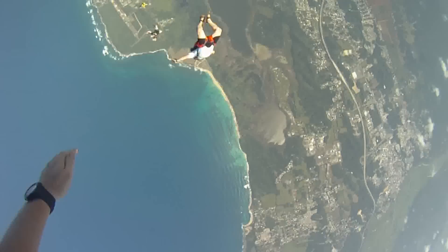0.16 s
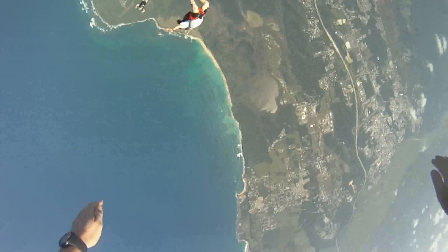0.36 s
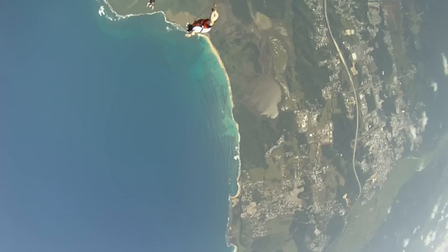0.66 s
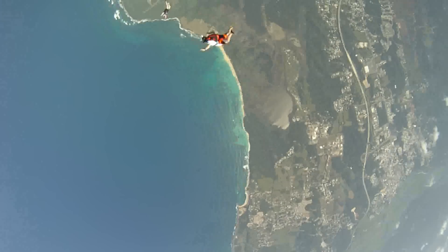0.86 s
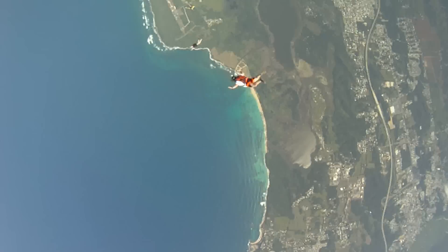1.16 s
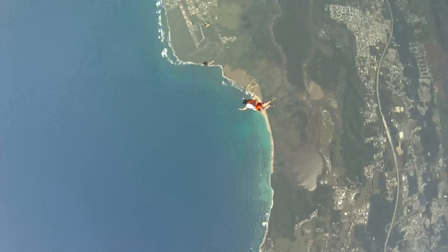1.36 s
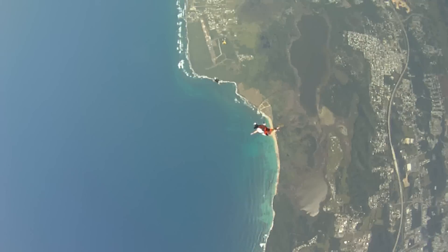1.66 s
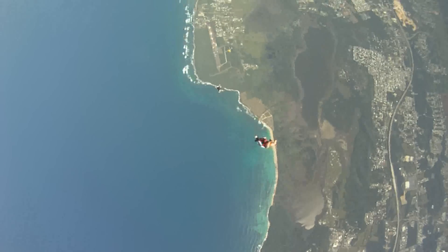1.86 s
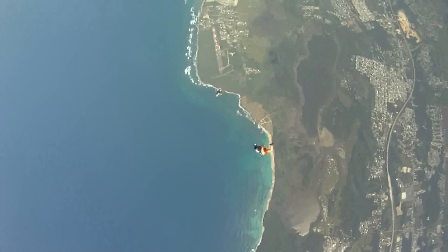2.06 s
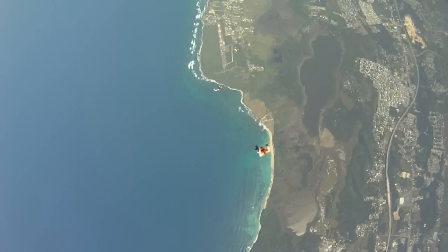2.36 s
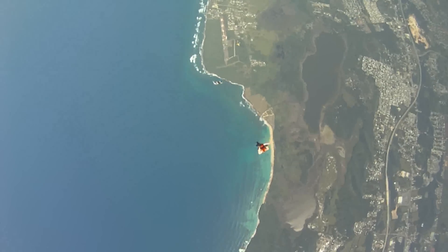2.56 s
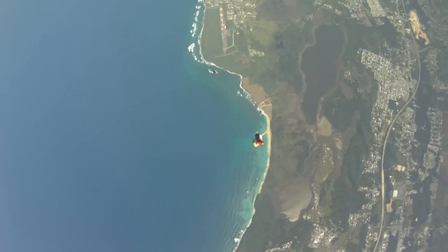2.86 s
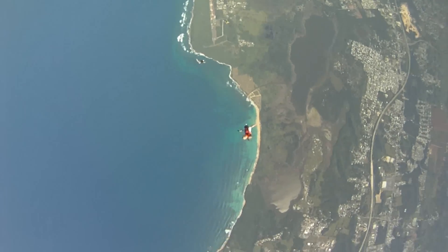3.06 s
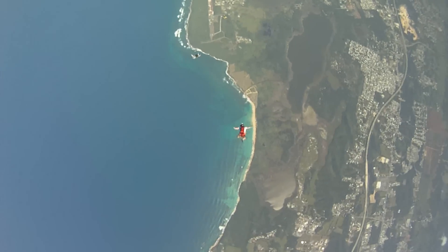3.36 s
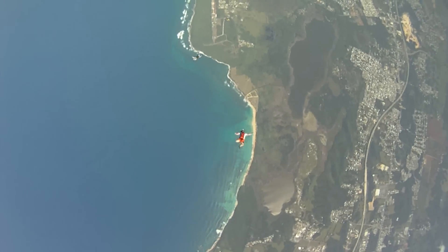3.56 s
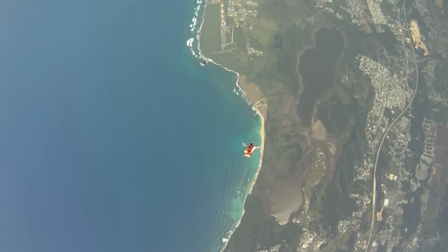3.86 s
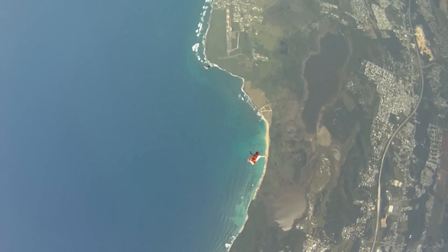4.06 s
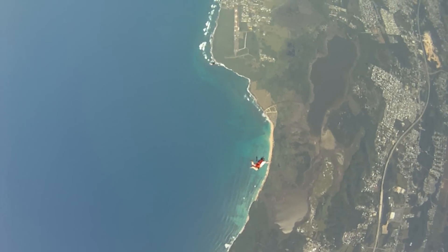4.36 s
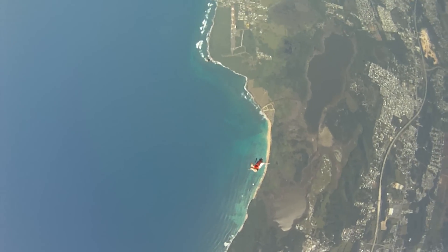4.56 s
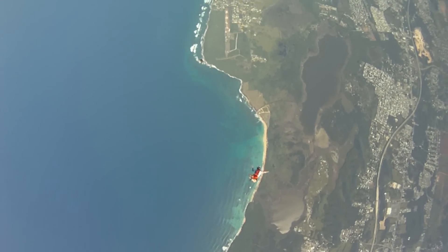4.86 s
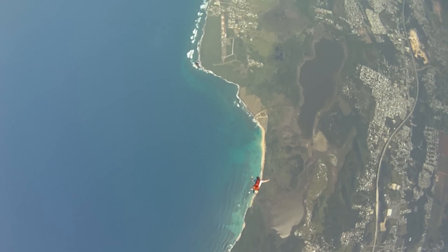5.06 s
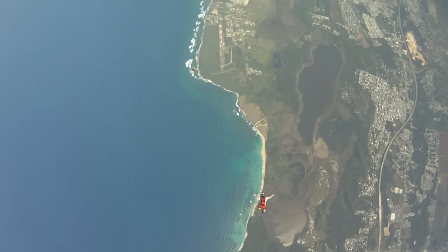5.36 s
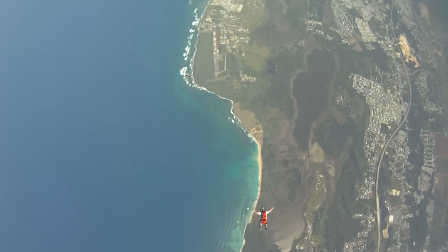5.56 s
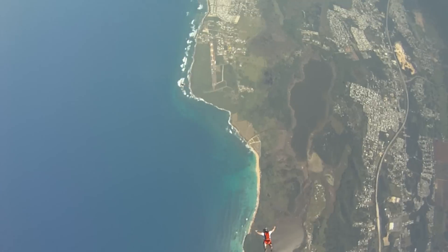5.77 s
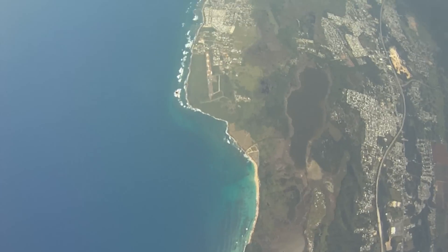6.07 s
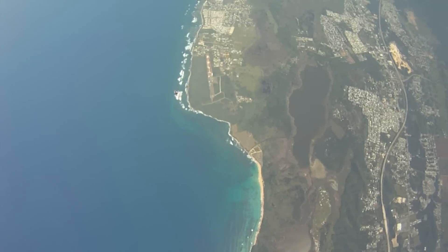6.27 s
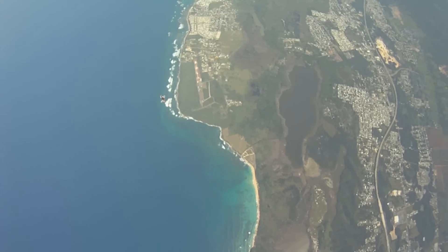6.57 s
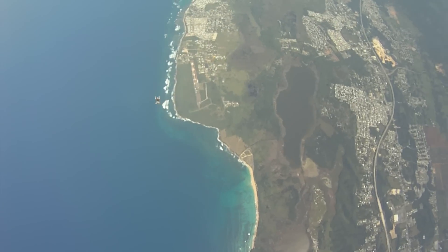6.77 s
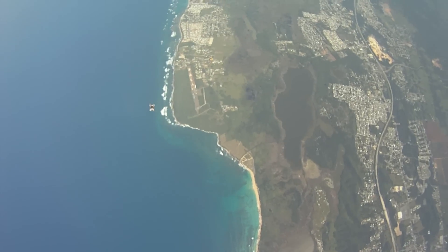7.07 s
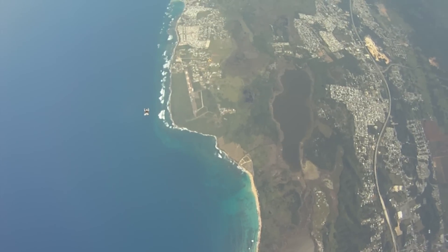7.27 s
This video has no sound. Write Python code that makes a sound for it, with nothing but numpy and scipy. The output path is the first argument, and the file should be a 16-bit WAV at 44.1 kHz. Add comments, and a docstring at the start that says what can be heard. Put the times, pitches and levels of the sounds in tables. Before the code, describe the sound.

Loud skydiving wind blasts a small cased camera: an opening thump, brief breathy whistles and a hollow hoot, then constant hissing, fluttering rush.

```python
"""A low thump comes first, then rushing air builds up fast: freefall past a skydiver's small cased camera.
Eddies, which are swirls of air, thump, rumble and roar on the case: shaped noise plus its resonances.
An edge whistles short notes as the head turns, over a hollow hoot of the case.
Loudest is the jet across the microphone port: it rushes and rings the port's cavity, with short surges.
The camera mirrors the sound into a gritty treble hiss, and its limiter ducks loud moments and recovers."""
import sys
import numpy as np
from scipy import signal
from scipy.fft import rfft, irfft, next_fast_len
from scipy.io import wavfile
from scipy.ndimage import uniform_filter1d, map_coordinates

SR = 44100
rng = np.random.default_rng(int(sys.argv[2]) if len(sys.argv) > 2 else 0)


def int16_out(signal):
    """Quantize to a 16-bit WAV file."""
    q = np.round(np.clip(np.atleast_2d(signal).T, -1, 1) * 32767)
    wavfile.write(sys.argv[1], SR, q.astype(np.int16))


N = 327222

# Strength of the smaller eddies on the case over time.
# Columns: time_s, rumble_db, roar_db (before small trims and wavering)
EDDY_LEVELS = [(0.0, -28, -35.5), (0.12, -20, -23), (0.27, -22, -17), (0.31, -23, -23), (0.78, -21, -24),
               (0.91, -25, -24.5), (1.01, -21, -24.5), (1.61, -23, -18.5), (3.35, -22, -16),
               (3.43, -23.5, -20.5), (4.07, -26, -20), (4.3, -21.5, -18.5), (4.32, -25.5, -20.5),
               (5.25, -29, -22), (5.46, -32, -22.5), (5.56, -27.5, -21.5), (7.11, -30.5, -22.5),
               (7.42, -30, -22)]
# Big eddies that strike the case.
# Columns: centre_s, length_s, buffet_rise_db
THUMPS = [(0.02, 0.15, 12), (0.17, 0.17, 6), (1.057, 0.2, 8.5), (1.654, .3, 6), (1.825, .16, 8),
          (2.38, .18, 8), (2.85, 0.56, 4.5), (4.13, 0.11, 11), (6.025, .24, 6)]
# How strongly the case and cavity ring compared with the plain rush; each resonance adds its own offset.
# Columns: time_s, ring_over_rush_db
RING_BALANCE = [(0, 2.5), (.8, -6), (1.5, -2.5), (3.2, -1.5), (3.6, 1), (4.5, 3.5), (5.5, 3), (7.42, 3)]
# Colour of the noise in each layer; only the shape counts, because each noise is scaled to rms 1.
# Columns: frequency_hz, relative_level_db (per Hz)
BUFFET_COLOUR = [(10, -26), (22, -15), (50, -2), (66, -4), (83, 1.5), (100, -7), (125, -24), (190, -26)]
RUMBLE_COLOUR = [(70, -36), (120, -0.5), (170, 3), (220, 1.5), (305, 3), (370, -4), (460, -8), (600, -5.5)]
ROAR_COLOUR = [(380, -24), (480, -17.5), (550, -3.5), (640, -4.5), (700, 2.5), (810, -2), (895, 3.5),
               (970, -4), (1180, -4.5), (1270, -4.5), (1450, -7), (1800, -9), (2500, -16)]
RUSH_COLOUR = [(1200, -10.5), (1700, -13), (2080, 3.5), (2580, -2), (2760, -6), (2990, -1), (3230, -10),
               (3500, -3.5), (3900, -9), (4430, -15), (5080, -7.5), (5400, -15.5), (5750, -28.5),
               (6000, -45)]
# Hollow hoots of the case in the slanting flow.
# Columns: start_s, length_s, level_db
HOOTS = [(0.286, .5, -21.5), (0.997, .3, -29)]
# Notes of the whistling edge; a positive scoop starts below the pitch.
# Columns: start_s, length_s, pitch_hz, scoop_hz, level_db
WHISTLE_NOTES = [(0.254, 0.15, 3110, 600, -23), (0.357, 0.31, 3534, 380.5, -19),
                 (0.64, 0.21, 4160, 198, -24.5), (1.046, 0.14, 4170, 1, -27.5),
                 (1.167, 0.1, 3550, 97, -21.5), (1.318, 0.034, 3450, -2, -18),
                 (1.36, 0.043, 3410, 201, -14.5)]
# Strength of the jet across the port, building up at first and then steady.
# Columns: time_s, level_db (before a small fixed lift)
JET_LEVELS = [(0.0, -42), (0.06, -32.5), (0.29, -14), (0.41, -18.5), (0.78, -18.5), (0.85, -13.5),
              (0.93, -17.5), (1.22, -17), (3.16, -18), (5.0, -16), (7.23, -16), (7.42, -15.5)]
# Sudden surges of the jet; the rushing air follows half of the rise in dB.
# Columns: centre_s, rise_db
SURGES = [(.836, 9), (1.638, 4), (2.123, 4), (2.766, 5.5), (3.495, 5), (3.634, 5.5), (3.842, 6.5),
          (4.307, 7), (4.519, 6), (4.777, 5), (5.091, 5.5), (5.312, 7.5), (5.431, 4), (5.743, 5.5),
          (6.165, 6), (6.407, 4.5), (6.562, 7.5), (7.004, 6), (7.082, 4), (7.284, 4)]
# Moments when the jet stalls.
# Columns: centre_s, drop_db
STALLS = [(3.87, 2.5), (6.425, 4), (6.6, 1), (7.041, 7)]
# Level of the very faint separate noise that slightly widens an almost mono sound.
# Columns: frequency_hz, side_gain_db
SIDE_LEVELS = [(150, -51), (700, -58), (2300, -36.5), (14000, -60)]
# Colour of the mirrored treble, thin around 12 kHz.
# Columns: frequency_hz, gain_db
TREBLE_COLOUR = [(6000, 5.5), (6900, -2.5), (8500, -8), (9650, -12.5), (10500, -17.5), (11100, -35),
                 (11600, -34), (12000, -60), (12400, -34), (12900, -23), (13700, -31), (14350, -14),
                 (15000, -41), (15400, -34)]

BUFFET_DB = -28.5  # buffet level when the rumble is average and no thump strikes
BUFFET_GROWS = 0.87  # dB of buffet gained per dB of rumble
WHISTLE_FADE = 0.17  # share of a note's length spent rising, and again falling
SCOOP_S, HOOT_FADE_S = 0.03, 0.038  # settling time of a note's pitch; rise and fall of a hoot
CAVITY_HZ = 2345  # centre of the port cavity's ring
FLUTTER_DB, FLUTTER_GROWS = 0.72, 0.1  # slow jet flutter at 0 dB ring; dB more per dB of ring
SURGE_S, STALL_S = 0.0099, 0.044  # full lengths
LOCK_DB = 4  # boost of the locked tone
MIRROR_HZ, TOP_HZ = 12000, 15400  # converter's rate; camera's upper band limit


def amp(db):
    """Turn decibels into a gain."""
    return 10 ** (np.asarray(db) / 20)


def unit(x):
    """Scale a signal to an average strength (rms) of 1."""
    return x / np.sqrt(np.mean(x ** 2) + 1e-20)


def along(points, hz):
    """Read a table of (frequency, value) points on a logarithmic frequency axis."""
    frequency, value = np.transpose(points)
    return np.interp(np.log(hz + 1), np.log(frequency + 1), value)


def curves(rows):
    """Join the points of each column after the time into one value per sample."""
    times, *columns = np.transpose(rows)
    return [np.interp(np.arange(N) / SR, times, column) for column in columns]


def wobble(rate):
    """A smooth random curve through rate random points a second."""
    knots = rng.standard_normal(N // 20)
    return map_coordinates(knots, [np.arange(N) * rate / SR], mode="wrap")


def swell(centre, length):
    """A smooth bump from 0 to 1 and back; times in seconds."""
    position = (np.arange(N) / SR - centre) / length
    return np.cos(np.pi * np.clip(position, -0.5, 0.5)) ** 2


def held(start, length, fade):
    """A gain that rises, holds at 1 and falls; times in seconds."""
    t = np.arange(N) / SR - start
    return np.clip(np.minimum(t, length - t) / fade, 0, 1)


def filtered(x, response):
    """Multiply the spectrum of x by a gain that depends on frequency."""
    size = next_fast_len(N + SR // 2)  # spare room keeps the end from wrapping onto the start
    spectrum = rfft(x, size) * response(np.fft.rfftfreq(size, 1 / SR))
    return irfft(spectrum, size)[..., :N]


def noise(colour):
    """Noise of rms 1 with the given colour, silent outside its frequency range."""
    def response(hz):
        inside = (hz >= colour[0][0]) & (hz <= colour[-1][0])
        return amp(along(colour, hz)) * inside
    return unit(filtered(rng.standard_normal(N), response))


def blown(centre_hz, width_hz):
    """Noise of rms 1 ringing in a steep-sided resonance, strongest at its centre."""
    def response(hz):
        damping = (hz * width_hz) ** 2
        return damping / ((centre_hz ** 2 - hz ** 2) ** 2 + damping)
    return unit(filtered(rng.standard_normal(N), response))


def ringing(rush, ring, ring_db):
    """Mix a ring into a rush, then scale so their combined power stays about the same."""
    return (rush + amp(ring_db) * ring) / np.sqrt(1 + amp(ring_db) ** 2)


def eddies():
    """Large eddies thump on the case, smaller ones rumble and roar, all exciting the case's resonances."""
    rumble_db, roar_db = curves(EDDY_LEVELS)
    ring_db, = curves(RING_BALANCE)

    thump_db = sum(rise * swell(centre, length) for centre, length, rise in THUMPS)
    buffet_db = BUFFET_DB + BUFFET_GROWS * (rumble_db - rumble_db.mean()) + thump_db
    thumps = ringing(noise(BUFFET_COLOUR), blown(centre_hz=85, width_hz=41), ring_db - 0.5)
    buffet = amp(buffet_db) * unit(np.tanh(0.5 * thumps))  # flatten the highest peaks

    rumble = ringing(noise(RUMBLE_COLOUR), blown(centre_hz=318, width_hz=120), ring_db - 7.5)
    rumble *= amp(rumble_db + 0.47 * wobble(14))

    roar = ringing(noise(ROAR_COLOUR), blown(centre_hz=864, width_hz=233), ring_db - 5.5)
    roar *= amp(roar_db + 0.11 + 0.78 * wobble(30))
    return buffet + rumble + roar


def hoot():
    """Slanting flow sets the case's hollow resonance sounding, as noise in a narrow band."""
    gain = sum(amp(db) * held(start, length, HOOT_FADE_S) for start, length, db in HOOTS)
    return gain * blown(centre_hz=278, width_hz=39)


def whistle(width_hz, waver_hz):
    """Vortices leave an edge unevenly, smearing each scooping, wavering note into a narrow band."""
    t = np.arange(N) / SR
    waver = waver_hz * wobble(90)
    # two slow random signals carry the note's cosine and sine, which makes it breathy
    breath_a, breath_b = filtered(rng.standard_normal((2, N)), lambda hz: 1 / (1 + (hz / width_hz) ** 2))
    notes = np.zeros(N)
    for start, length, pitch_hz, scoop_hz, db in WHISTLE_NOTES:
        pitch = pitch_hz + waver - scoop_hz * np.exp(-np.abs(t - start) / SCOOP_S)
        phase = 2 * np.pi * np.cumsum(pitch) / SR
        tone = unit(breath_a * np.cos(phase) + breath_b * np.sin(phase))
        notes += amp(db) * held(start, length, WHISTLE_FADE * length) * tone
    return notes


def jet():
    """Air rushing over the port rings its cavity, flutters, and locks it into one tone in each surge."""
    jet_db, = curves(JET_LEVELS)
    ring_db, = curves(RING_BALANCE)
    # the slower flutter deepens as the cavity rings harder
    flutter_db = (FLUTTER_DB + FLUTTER_GROWS * ring_db) * wobble(45) + 0.72 * wobble(260)
    stall_db = sum(drop * swell(centre, STALL_S) for centre, drop in STALLS)
    surge_db = sum(rise * held(centre - SURGE_S / 2, SURGE_S, SURGE_S / 4) for centre, rise in SURGES)

    ring = blown(centre_hz=CAVITY_HZ, width_hz=334) * amp(0.29 * wobble(110))
    air = ringing(noise(RUSH_COLOUR), ring, ring_db) * amp(0.5 * surge_db + flutter_db)

    locked_pitch = CAVITY_HZ + 90 * wobble(300)
    locked_tone = np.sin(2 * np.pi * np.cumsum(locked_pitch) / SR)
    locked = amp(LOCK_DB) * (amp(surge_db) - 1) * locked_tone  # silent between surges
    return (air + locked) * amp(jet_db - stall_db + 1.15)


def scene():
    """Almost mono sound; a very faint separate noise, set by a table, slightly widens it."""
    mid = eddies() + hoot() + whistle(width_hz=150, waver_hz=19) + jet()
    side = filtered(eddies() + jet(), lambda hz: amp(along(SIDE_LEVELS, hz)))
    return np.array([mid + side, mid - side])


def mirrored(x):
    """A coarse converter repeats each frequency on both sides of its rate; a table sets the treble's colour."""
    images = 2 * x * np.cos(2 * np.pi * MIRROR_HZ * np.arange(N) / SR)
    return x + filtered(images, lambda hz: amp(along(TREBLE_COLOUR, hz)))


def limiter(x, threshold_db, deepest_db, release_db_per_s, attack_s):
    """Loud moments pull the gain down with a short lag, up to a limit; it then climbs back steadily."""
    power = np.abs(uniform_filter1d(np.mean(x ** 2, axis=0), size=220))  # averaged over about 5 ms
    over_db = np.clip(10 * np.log10(power + 1e-12) - threshold_db, 0, deepest_db)
    climb_db = release_db_per_s * np.arange(N) / SR
    # holding the highest point of a rising slope makes each cut shrink at the release rate
    cut_db = np.maximum.accumulate(over_db + climb_db) - climb_db
    pole = np.exp(-1 / (attack_s * SR))
    smooth_cut_db = signal.lfilter([1 - pole], [1, -pole], cut_db)
    return x * amp(-smooth_cut_db)


def record(dry):
    """The camera adds mirror images, limits, rounds off the highest peaks and cuts above its band limit."""
    x = mirrored(dry) * amp(0.1)
    x = limiter(x, threshold_db=-10.0, deepest_db=8.0, release_db_per_s=31, attack_s=0.0019)
    x = x / (1 + np.abs(x) ** 12) ** (1 / 12)
    return filtered(x, lambda hz: hz < TOP_HZ)


dry = scene()
out = record(dry)
int16_out(out)
```